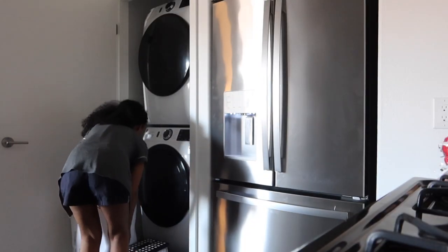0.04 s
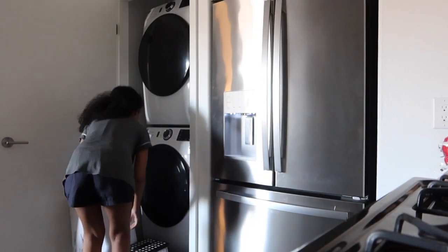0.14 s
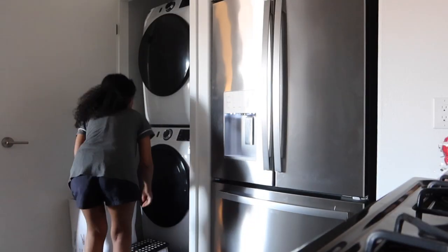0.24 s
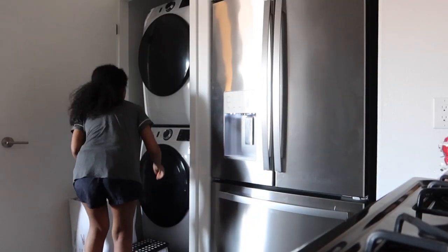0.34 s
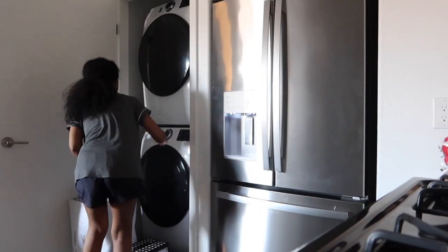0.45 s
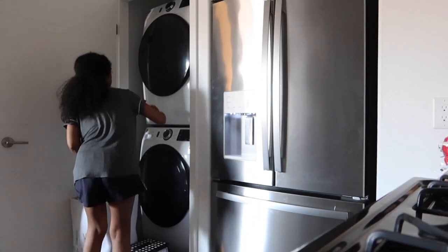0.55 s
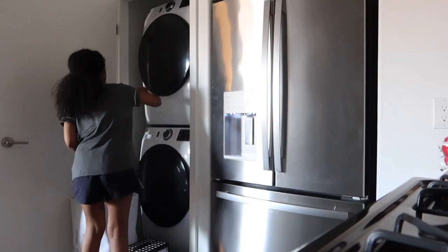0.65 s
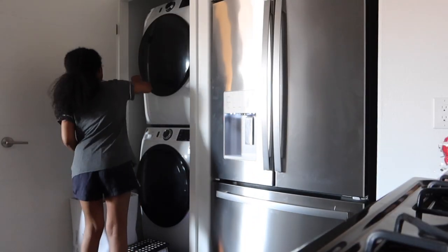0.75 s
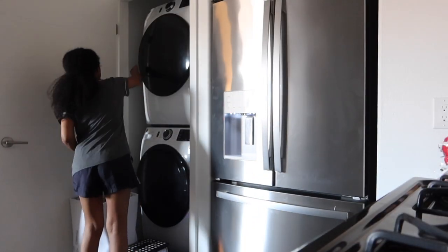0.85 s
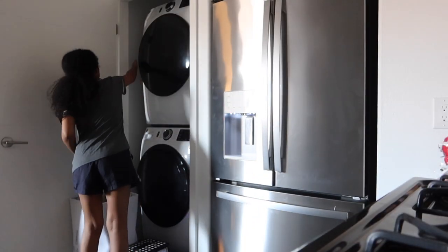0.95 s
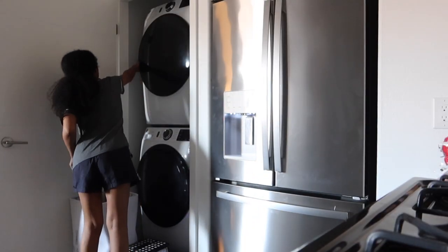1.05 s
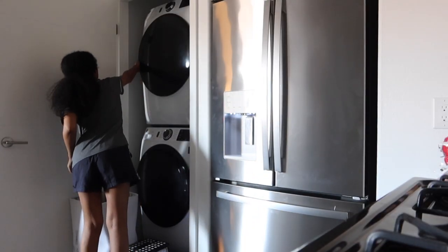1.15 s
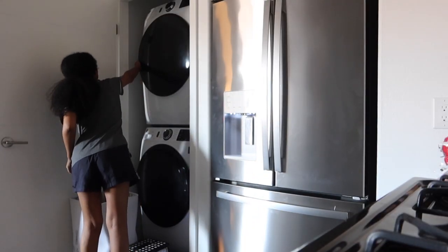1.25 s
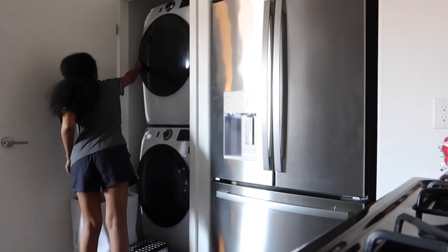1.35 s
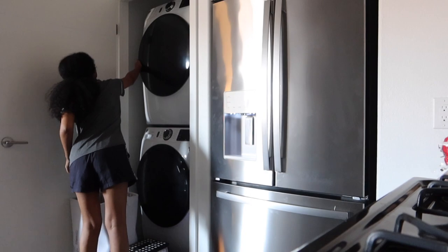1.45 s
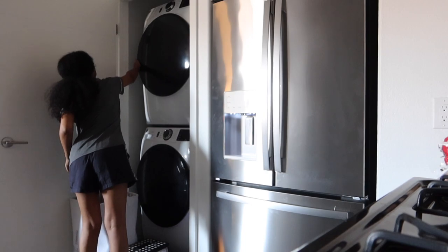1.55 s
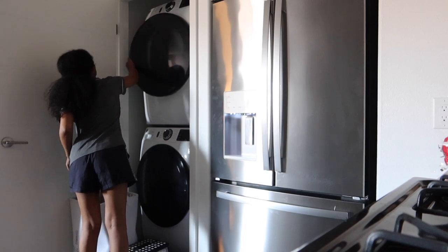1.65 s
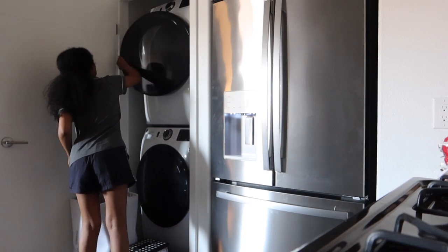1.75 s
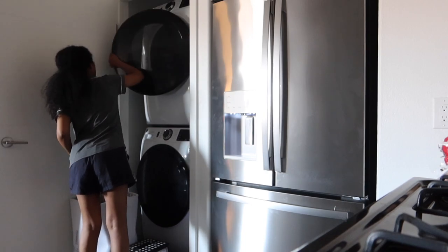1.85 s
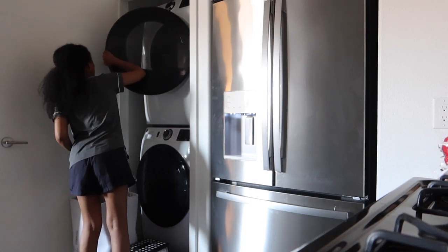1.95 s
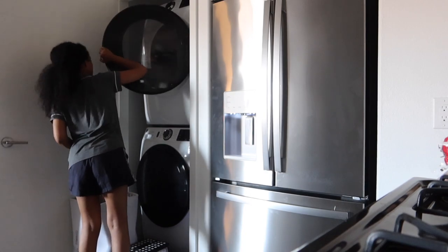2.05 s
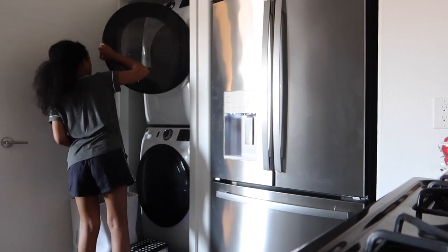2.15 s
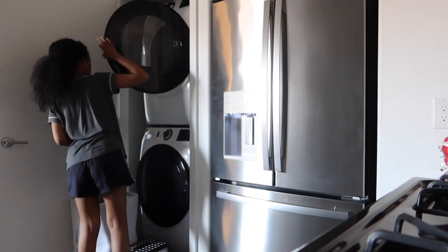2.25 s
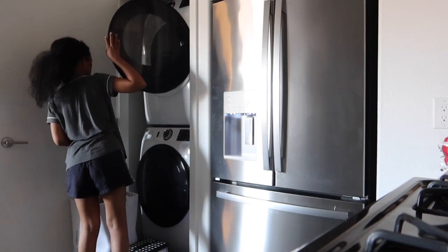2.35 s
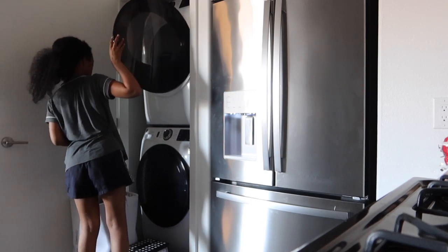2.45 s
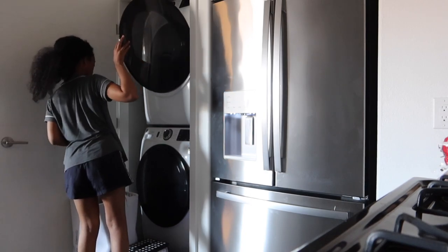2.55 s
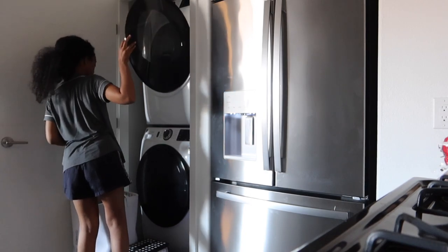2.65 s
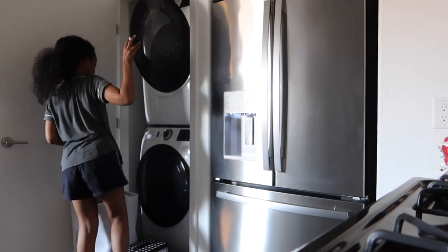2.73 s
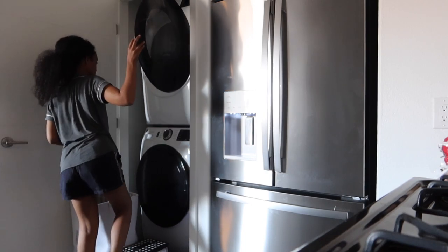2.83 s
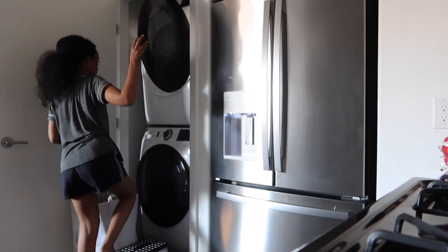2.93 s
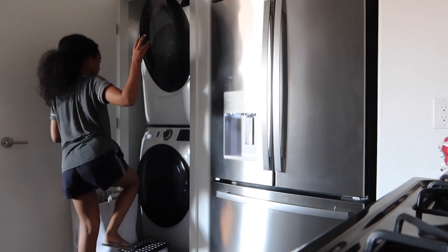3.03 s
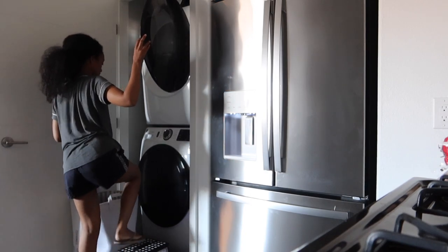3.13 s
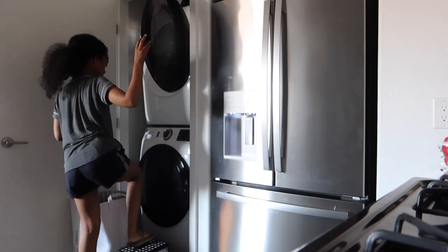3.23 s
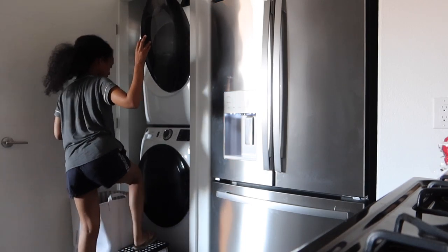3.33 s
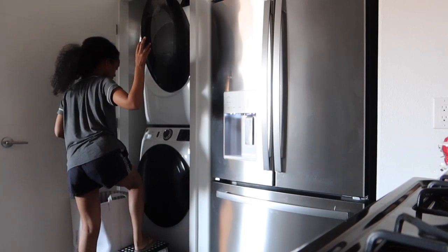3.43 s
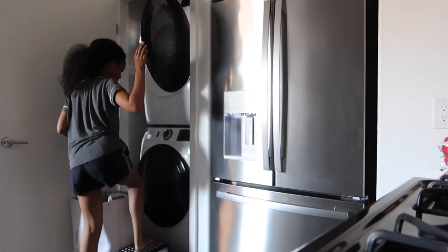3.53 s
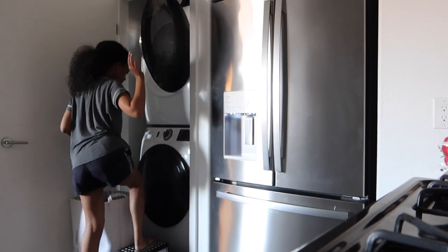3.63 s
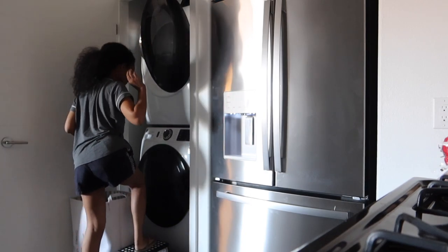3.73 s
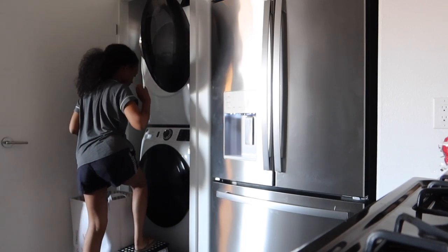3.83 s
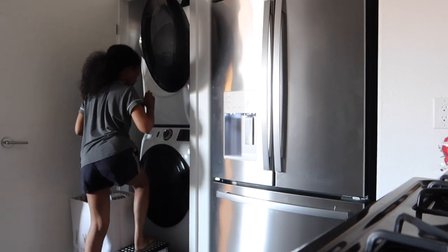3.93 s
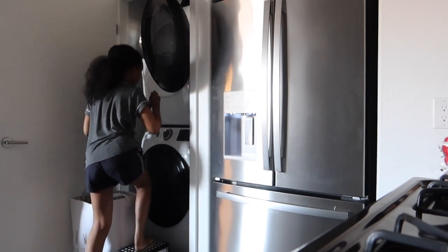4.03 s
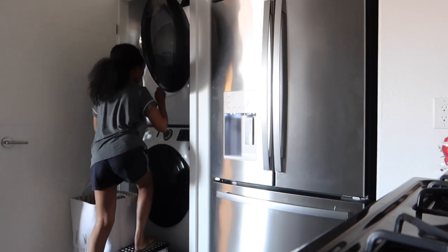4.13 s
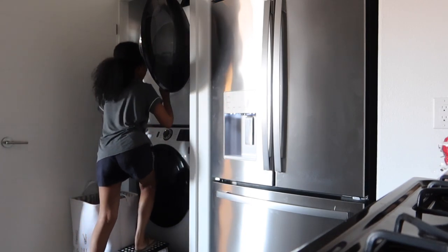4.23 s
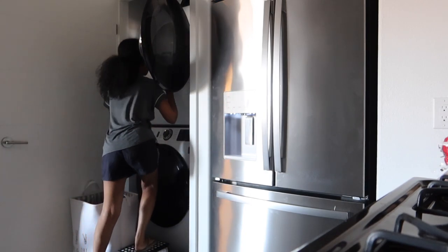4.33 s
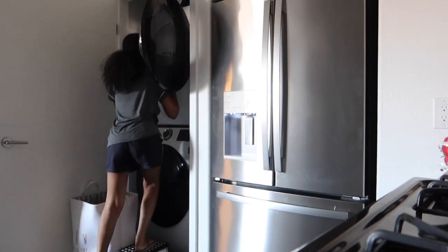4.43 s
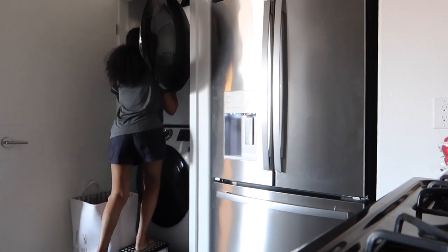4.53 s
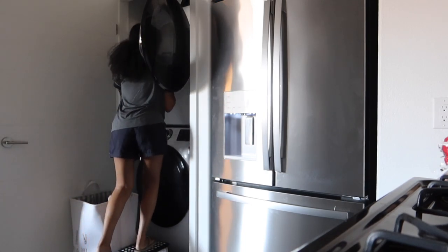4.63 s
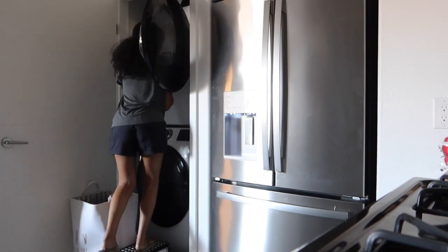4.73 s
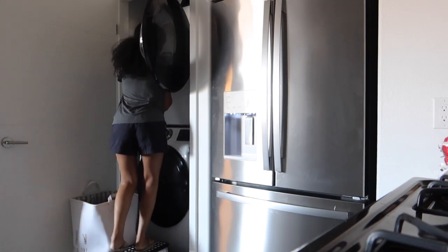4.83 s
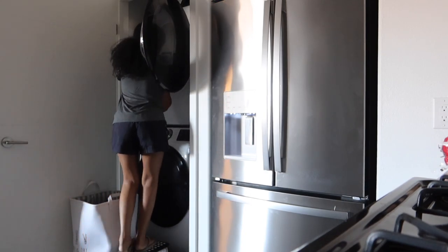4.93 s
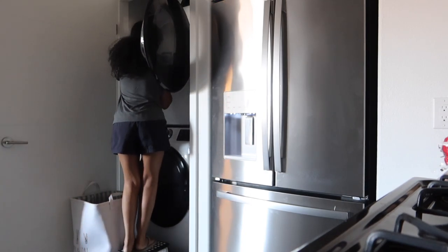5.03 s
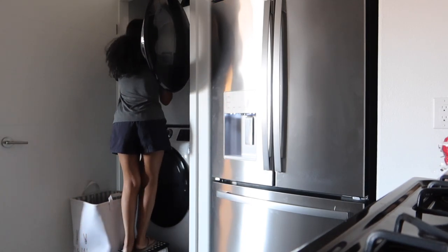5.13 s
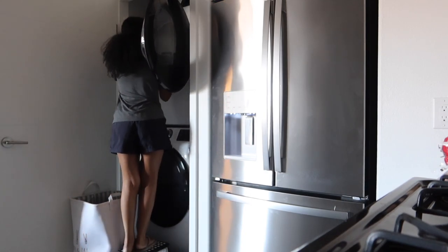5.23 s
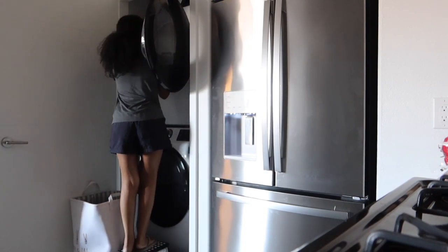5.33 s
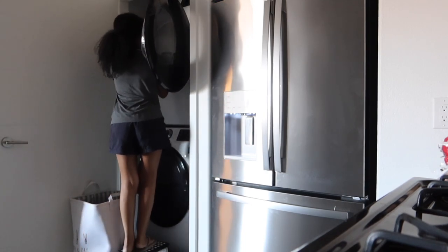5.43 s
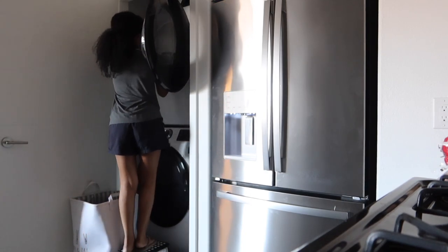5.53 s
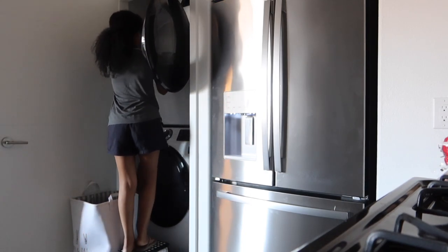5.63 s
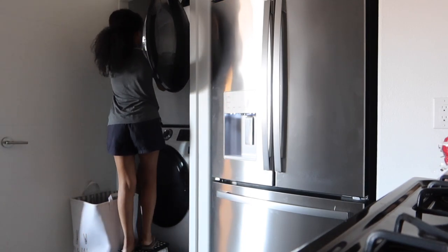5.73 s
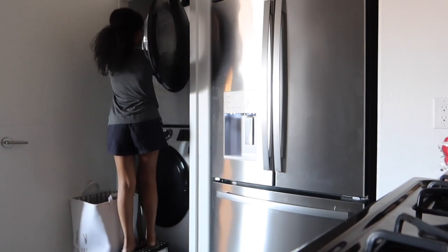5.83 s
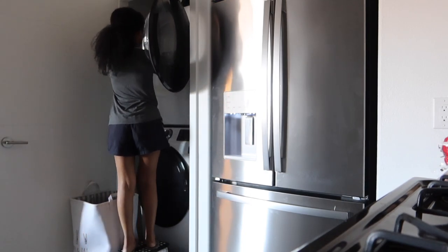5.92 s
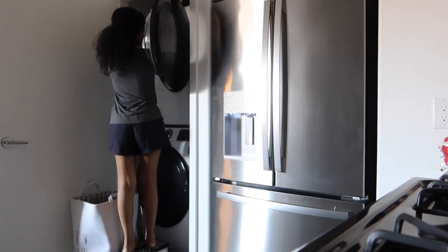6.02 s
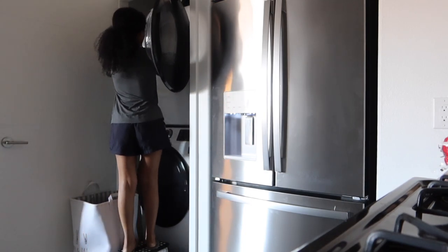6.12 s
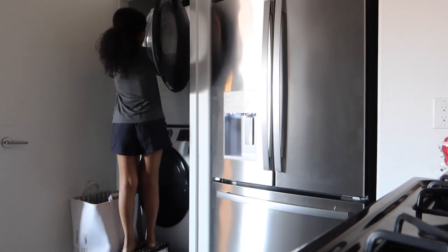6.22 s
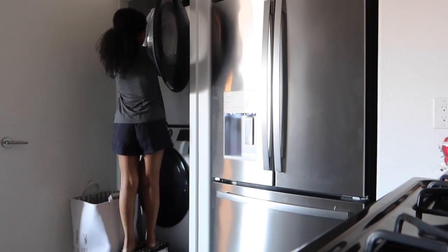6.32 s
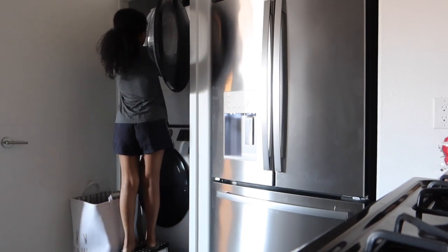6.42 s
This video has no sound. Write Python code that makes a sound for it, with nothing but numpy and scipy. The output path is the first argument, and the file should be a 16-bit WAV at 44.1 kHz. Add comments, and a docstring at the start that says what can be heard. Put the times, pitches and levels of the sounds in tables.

```python
"""In a hard-walled kitchen a knock dies away over an appliance's low hum, and a washer door thuds shut.
The dryer's catch strains and snaps free; feet mount a plastic step stool as the dryer door knocks at its stop.
Each blow is a tick and crack, a short dense ring, the room's tail and, save for light taps, lasting modes.
The hum is rumble, unsteady tones and hiss; brushing clothes are noise that swells with each move."""
import sys
import numpy as np
from scipy import signal
from scipy.fft import rfft, irfft
from scipy.io import wavfile

SR = 44100
rng = np.random.default_rng(int(sys.argv[2]) if len(sys.argv) > 2 else 0)


def int16_out(signal):
    """Quantize to a 16-bit WAV file."""
    q = np.round(np.clip(np.atleast_2d(signal).T, -1, 1) * 32767)
    wavfile.write(sys.argv[1], SR, q.astype(np.int16))


N = 285439

# spectral shape of the hard, high ticks: f/Hz, relative level per Hz/dB
TICK_COLOUR = [(1500, -21), (4000, -27), (7000, 2), (12500, 5), (14000, -6), (15500, -28)]
# stereo width of the ticks at the two microphone ports: f/Hz, side minus mid/dB
TICK_WIDTH = [(3000, -10), (7000, -7), (12000, 2.5)]
# stereo width of the background and the cloth: f/Hz, side minus mid/dB
DIFFUSE_WIDTH = [(45, -44), (80, -41), (130, -16.5), (300, -12), (700, -11.5), (1400, -8), (3100, -5),
                 (7000, -3.5), (14000, -2)]
# spectral shape of the dense ring of stool and light taps: f/Hz, relative level per Hz/dB
STOOL_COLOUR = [(30, -8), (110, -0.5), (220, -5), (320, 3.5), (520, -5), (850, -5), (1400, -7), (2400, -11),
                (3400, -17), (5000, -24), (8000, -33), (13000, -40), (15500, -50)]


def amp(db):
    """Decibels to gain."""
    return 10 ** (np.asarray(db) / 20)


def rms(x):
    """Root mean square."""
    return np.sqrt(np.mean(abs(x) ** 2) + 1e-20)


def read(points, hz):
    """A table's value, interpolated along a log-frequency axis."""
    f, value = np.transpose(points)
    return np.interp(np.log(hz + 1), np.log(f + 1), value)


def add(mix, start_s, sound):
    """Lays a sound into the mix at a start time."""
    start = max(round(start_s * SR), 0)
    part = mix[:, start:][:, :sound.shape[1]]
    part += sound[:, :part.shape[1]]


def port_noise(colour, width, size):
    """Two-port noise of rms 1 with a given spectral shape and stereo width."""
    hz = np.fft.rfftfreq(size, 1 / SR)
    mid, side = np.exp(2j * np.pi * rng.random((2, len(hz))))  # random phases
    spread = amp(read(width, hz))
    ports = np.array([mid + spread * side, mid - spread * side])
    ports /= np.sqrt(1 + spread ** 2)  # width leaves the power unchanged
    x = irfft(ports * amp(read(colour, hz)), size)
    return x / rms(x)


def drift(rate_hz, size=N):
    """Random wander of rms 1: white noise under a Gaussian low-pass."""
    hz = np.fft.rfftfreq(size, 1 / SR)
    lowpass = np.exp(-(hz / rate_hz) ** 2)
    x = irfft(rfft(rng.standard_normal(size)) * lowpass, size)
    return x / rms(x)


def octaves(x, count=9):
    """Splits a sound into overlapping octave bands that sum to it: (centre Hz, band)."""
    centres = 50 * 2. ** np.arange(count)
    hz = np.fft.rfftfreq(x.shape[1], 1 / SR)
    spectrum = rfft(x)
    bands = []
    for centre in centres:
        weight = read(np.c_[centres, centres == centre], hz)  # 1 at its centre, 0 at its neighbours'
        bands.append((centre, irfft(spectrum * weight)))
    return bands


def swelling(rows, steady_db):
    """Gain over time: a smooth arch for each row adds its power to a steady level."""
    t = np.arange(N) / SR
    power = amp(steady_db) ** 2
    for middle_s, length_s, db in rows:
        arch = np.cos(np.pi * np.clip((t - middle_s) / length_s, -.5, .5))
        power = power + (amp(db) * arch) ** 2
    return np.sqrt(power)


def blow(row, colour, modes, ring_db, early_db, early_t60, tick_db, contact_s, bright_hz=2200, thump_hz=330,
         build_cycles=0.38, crack_db=5, crack_t60=0.02, tick_t60=0.039, chatter_db=1.2):
    """One contact: a tick and crack, the object's short dense ring, the room's tail and any lasting modes."""
    # time for the room's tail to fall by 60 dB: f/Hz, t60/s
    room_t60 = [(60, 1.06), (200, 0.84), (600, 1.35), (1400, 1.13), (3000, 1.037), (6000, 0.9),
                (14000, 0.46)]
    # stereo width of the dense ring: f/Hz, side minus mid/dB
    near_width = [(50, -50), (95, -46), (160, -45), (260, -27), (700, -28), (1300, -27), (2400, -54),
                  (3400, -8), (4800, -6.5), (7500, -1), (13000, 2.5)]
    tick_per_bright = 0.33  # dB of tick for each dB of brightness
    _, level_db, thump_db, bright_db = row
    t = np.arange(SR) / SR

    def drive(hz):
        """How hard and how fast a frequency is excited: bass takes longer to fill the room."""
        low = 1 / (1 + (hz / thump_hz) ** 3)
        high = 1 / (1 + (bright_hz / hz) ** 3)
        rise = 1 - np.exp(-t / (contact_s + build_cycles / hz))
        return amp(thump_db * low + bright_db * high) * rise

    def fade(db, t60):
        """Exponential decay from a level, 60 dB down after t60 seconds."""
        return amp(db - 60 * t / t60)

    chatter = amp(chatter_db * drift(rate_hz=110, size=SR))  # loose parts and near walls break up the first ring
    early = chatter * fade(early_db, early_t60)
    crack = fade(crack_db, crack_t60)
    tick_rise = 1 - np.exp(-t / (contact_s + 1 / SR))
    tick = chatter * fade(tick_db + tick_per_bright * bright_db, tick_t60) * tick_rise
    out = tick * port_noise(TICK_COLOUR, TICK_WIDTH, size=SR)
    for hz, band in octaves(port_noise(colour, near_width, size=SR)):
        tail = fade(0, read(room_t60, hz))
        out += band * drive(hz) * np.sqrt(tail ** 2 + early ** 2 + crack ** 2)
    for hz, db, t60 in modes:
        tone = np.sin(2 * np.pi * (hz * t + rng.random()))
        out += drive(hz) * fade(ring_db + db, t60) * tone
    return amp(level_db) * out


def play(rows, colour, modes, ripple_db=4.0, count=240, **body):
    """All the blows of one kind; many small resonances colour every blow alike."""
    hz = np.linspace(0, SR / 2, count)
    bumps = np.sqrt(3) * rng.uniform(-1, 1, count)  # uniform draws scaled to an expected rms of 1
    ripple = ripple_db * bumps * hz / (hz + 500)  # shallower in the bass
    hz_fine = np.geomspace(10, SR / 2, 10 * count)
    rippled_db = read(colour, hz_fine) + np.interp(hz_fine, hz, ripple)
    rippled_colour = np.c_[hz_fine, rippled_db]
    out = np.zeros((2, N))
    for row in rows:
        add(out, row[0], blow(row, rippled_colour, modes, **body))
    return out


def hum(waver=0.23, wander_turns=0.15):
    """A running appliance: low rumble, unsteady tones and a faint rush of air."""
    # spectral shape of the rumble: f/Hz, relative level per Hz/dB
    rumble_colour = [(15, -32), (27, -23), (45, -7.5), (60, -17.5), (76, -6.5), (140, -7), (185, -11.5),
                     (225, -17.5), (290, -11.5), (360, -11), (455, -11), (510, -24.5), (800, -60)]
    # spectral shape of the rush of air: f/Hz, relative level per Hz/dB
    air_colour = [(30, 2), (400, -13), (620, 1.5), (880, -0.5), (1200, -6), (2000, -11), (3200, -15.5),
                  (5000, -21), (8000, -27), (12500, -35.5), (15500, -48)]
    # tones, the low drone first, before swell and wander: f/Hz, nominal rms level/dB
    lines = [(91.8, -49.5), (291, -59), (420, -58.5)]
    # arches that lift the low drone: middle t/s, length/s, arch gain/dB
    swells = [(1.35, 1.5, 2.5), (2.45, 0.92, 6), (4.95, .7, 5.5)]
    rumble_db, air_db = -41.5, -48.5
    wander_db, wander_hz = 2.5, 3.4  # depth and rate of the drone's random wander
    t = np.arange(N) / SR
    tones = []
    for hz, db in lines:
        level = amp(db) * (1 + waver * drift(rate_hz=18))
        turns = hz * t + wander_turns * drift(rate_hz=7.0)
        tones.append(np.sqrt(2) * level * np.sin(2 * np.pi * turns))
    wander = amp(wander_db * drift(rate_hz=wander_hz))
    drone = swelling(swells, steady_db=-0.5) * wander * tones[0]
    rumble = amp(rumble_db) * port_noise(rumble_colour, DIFFUSE_WIDTH, size=N)
    air = amp(air_db) * port_noise(air_colour, DIFFUSE_WIDTH, size=N)
    return drone + sum(tones[1:]) + rumble + air


def shuffle(grain_db=2.0):
    """Clothes brush: soft uneven noise that swells and fades with each move of the body."""
    # brushing as the body reaches and climbs: middle t/s, length/s, arch level/dB
    rubs = [(1.07, 0.21, -53), (3.023, .5, -57), (4.904, .25, -59.5)]
    # spectral shape of the cloth: f/Hz, relative level per Hz/dB
    cloth_colour = [(200, -4), (800, -1.5), (2500, -1.5), (5000, -10.5), (10000, -23), (15000, -26)]
    grain = amp(grain_db * drift(rate_hz=33))
    gain = swelling(rubs, steady_db=-64)  # a faint rustle stays between the moves
    return gain * grain * port_noise(cloth_colour, DIFFUSE_WIDTH, size=N)


def stool():
    """A knock dies away; later hollow plastic clacks against the hard floor, with short-lived modes."""
    # the end of a knock dying away, then feet loading the step stool: t/s, level/dB, thump/dB, brightness/dB
    blows = [(.002, -45, 5, -10), (3.456, -35.5, -19, -8), (3.477, -34.5, 0.5, -5.5),
             (3.51, -49.5, 20, -11), (4.766, -44.5, -8, -21), (5.01, -35.5, 6.5, -22), (5.019, -44, 2, 6.5),
             (5.068, -34.5, -23, -1.5)]
    # modes that stand out: f/Hz, level before the ring level/dB, t60/s
    modes = [(110, -2, 0.46), (140.6, 8, 0.31), (298.3, 7.5, 0.34), (348, 0, 0.15), (634, 1, 0.27),
             (837, -10, .5), (944, 9.5, 0.13), (1240, 3, 0.39), (1280, -7, .45), (1580, 0, 0.41)]
    return play(blows, STOOL_COLOUR, modes, ring_db=-9.5, early_db=4.0, early_t60=0.38, bright_hz=3050,
                crack_db=3.5, crack_t60=0.058, tick_db=-17, contact_s=0.0019)


def taps(thump_db=-12, bright_db=6.0):
    """Light, thin taps and brushes of hands and feet on stool and door, with no ringing modes."""
    # the taps and brushes: t/s, level/dB
    touches = [(.3, -54.5), (2.752, -53.5), (4.424, -49.5), (4.52, -56), (5.72, -55), (5.899, -56.5)]
    rows = [(s, db, thump_db, bright_db) for s, db in touches]
    return play(rows, STOOL_COLOUR, [], ring_db=0, early_db=2.5, early_t60=0.46, bright_hz=2790,
                crack_db=6.5, crack_t60=.085, tick_db=-27, contact_s=.002)


def washer_door():
    """The rubber seal cushions the door; the drum booms briefly."""
    # the door thudding onto its seal and settling: t/s, level/dB, thump/dB, brightness/dB
    blows = [(.459, -38.5, 12.5, -12), (.478, -30, -5, -1.5), (.506, -43, 0, 4), (.6, -49, -8, 8),
             (.79, -49.5, -9, 3)]
    # spectral shape of the dense ring: f/Hz, relative level per Hz/dB
    colour = [(30, -8), (105, 6.5), (170, -7), (230, 1), (340, 1), (520, -6), (800, -5), (1300, -8.5),
              (2300, -9), (3400, -14.5), (5000, -19), (8000, -28), (13000, -33), (15500, -52)]
    # modes that stand out: f/Hz, level before the ring level/dB, t60/s
    modes = [(106, 1.5, 0.77), (360, 12, 0.2), (880, -13, 0.39)]
    return play(blows, colour, modes, ring_db=-8, early_db=1.0, early_t60=0.36, tick_db=-15, contact_s=0.01)


def clicks(rise_s=.0015, t60=0.069):
    """Small hard parts meet with a short, high tick."""
    # sharp clicks of the catches, the hinge and the stool's joints: t/s, level/dB
    ticks = [(.79, -58), (1.152, -51), (1.417, -57), (1.497, -51), (1.6, -38), (1.646, -34), (1.932, -58),
             (3.48, -52), (3.658, -47), (5.04, -51), (5.07, -51)]
    t = np.arange(SR) / SR
    out = np.zeros((2, N))
    shape = (1 - np.exp(-t / rise_s)) * np.exp(-np.log(1000) * t / t60)
    for s, db in ticks:
        add(out, s, amp(db) * shape * port_noise(TICK_COLOUR, TICK_WIDTH, size=SR))
    return out


def catch_slips():
    """Blows of the straining catch: as the pull grows, each slip is thinner and sharper."""
    # the catch slipping: t/s, level/dB
    slips = [(1.416, -40.5), (1.444, -45.5), (1.475, -35.5), (1.497, -32), (1.564, -26.5), (1.596, -30)]
    first_thump_db, first_bright_db = 7, -8  # tone of the first, dull slip
    thump_db_per_s, bright_db_per_s = -61, 57
    first_s = slips[0][0]
    rows = []
    for s, db in slips:
        thump_db = first_thump_db + thump_db_per_s * (s - first_s)
        bright_db = first_bright_db + bright_db_per_s * (s - first_s)
        rows.append((s, db, thump_db, bright_db))
    return rows


def dryer_door():
    """The catch jolts the door and the steel cabinet, whose many modes ring on."""
    # the door being grabbed, snapping free and rattling: t/s, level/dB, thump/dB, brightness/dB
    blows = [(1.152, -40, -5, -2.5), (1.604, -19, -3.5, -1.5), (1.652, -28.5, 4.5, -6),
             (1.688, -46.5, 19, -18), (1.867, -38, -2, -6), (1.932, -54, -3, 4)]
    # spectral shape of the dense ring: f/Hz, relative level per Hz/dB
    colour = [(25, -15), (45, -7), (100, -11), (152, -4), (220, -10.5), (340, -5.5), (450, -11),
              (820, -8.5), (1400, -8), (2500, -12), (3600, -18), (5000, -27), (11500, -37.5), (15000, -46)]
    # modes that stand out: f/Hz, level before the ring level/dB, t60/s
    modes = [(48, 0, 0.27), (151.8, 8, 0.95), (358, -3, 0.85), (474.5, 3.5, 1), (780, 3, 0.86),
             (818, 10, 0.68), (971, 7, 0.89), (1257, 5, 0.67), (1295, -8, 0.76), (1333, -4, .9),
             (1415, -5, 0.6), (1495, -8, 0.71), (1590, -11, 0.99), (1720, 5.5, 1.0), (1930, 8, 0.58),
             (2140, 3, 0.28), (2340, -14, 0.9), (2420, -13, 0.54), (2460, 1, 0.44), (2774, 1, 0.33),
             (3410, -4, 0.99)]
    return play(catch_slips() + blows, colour, modes, ripple_db=1.64, ring_db=-17.5, early_db=0.7,
                early_t60=0.38, crack_db=-2, crack_t60=0.037, build_cycles=1.15, tick_db=-21, contact_s=.0003)


def door_stop():
    """The hinge takes the swing of the dryer door and rings thinly."""
    # the open door knocking at the end of its swing: t/s, level/dB, thump/dB, brightness/dB
    blows = [(3.657, -33.5, -5, 1), (3.682, -37.5, 1, 2.5)]
    # spectral shape of the dense ring: f/Hz, relative level per Hz/dB
    colour = [(60, -42), (300, 5), (700, -3), (950, -2), (1230, 5), (1750, -3.5), (2400, -1.5),
              (3200, -9.5), (4200, -22), (6000, -31), (12000, -39), (15000, -47)]
    # modes that stand out: f/Hz, level before the ring level/dB, t60/s
    modes = [(1234, 9, 0.83), (1340, -11, 0.96), (1474, -3, 1.4), (2210, -9, .5), (2230, -2, 0.47),
             (2500, 6, 0.48), (2590, -7, 0.51), (3085, -13, .5)]
    return play(blows, colour, modes, ring_db=-13.5, early_db=3.5, early_t60=0.36, tick_db=-19,
                contact_s=0.00097)


def scene():
    """Everything heard in the kitchen."""
    background = hum() + shuffle()
    contacts = stool() + taps() + clicks()
    doors = washer_door() + dryer_door() + door_stop()
    return background + contacts + doors


def record(dry):
    """The recorder's band limit: a steep linear-phase low-pass."""
    cutoff_hz = 15300
    lowpass = signal.firwin(511, cutoff_hz, window=("kaiser", 9), fs=SR)
    return signal.oaconvolve(dry, lowpass[None], "same")


dry = scene()
out = record(dry)
int16_out(out)
```